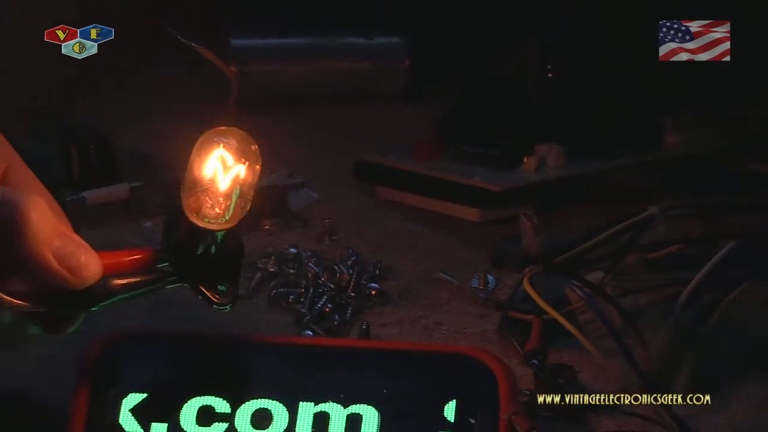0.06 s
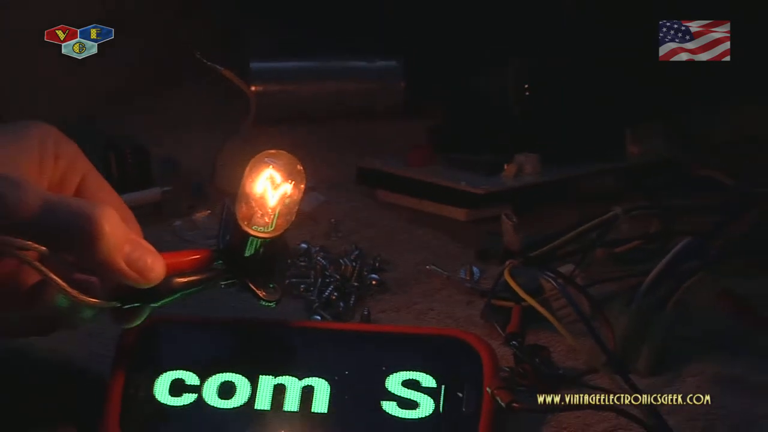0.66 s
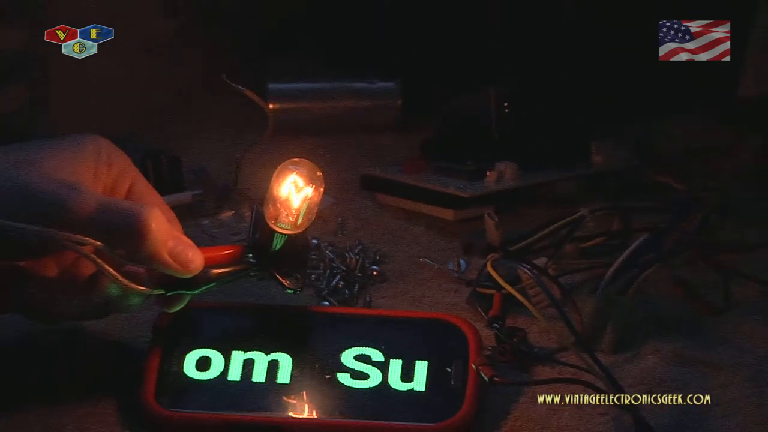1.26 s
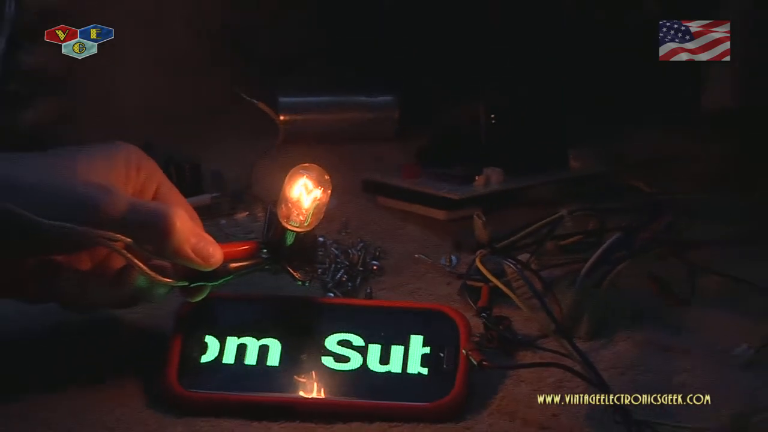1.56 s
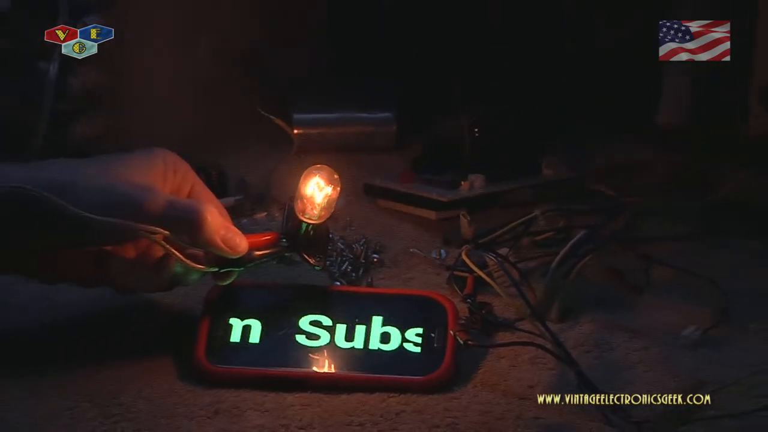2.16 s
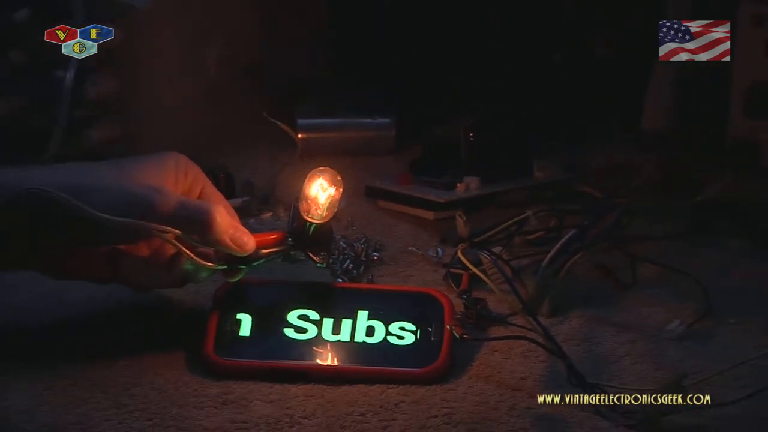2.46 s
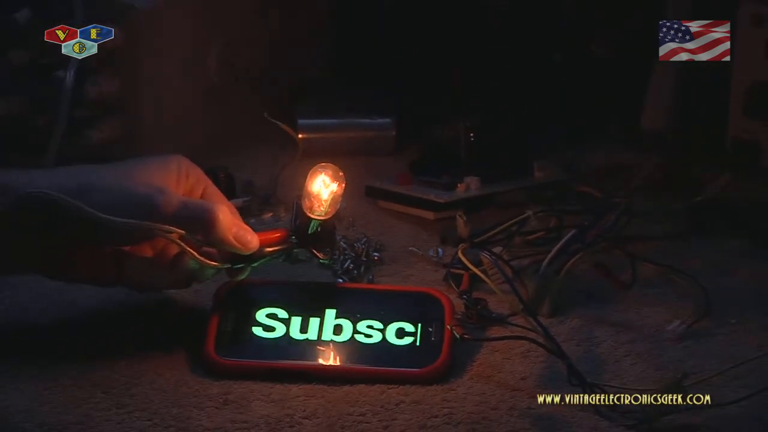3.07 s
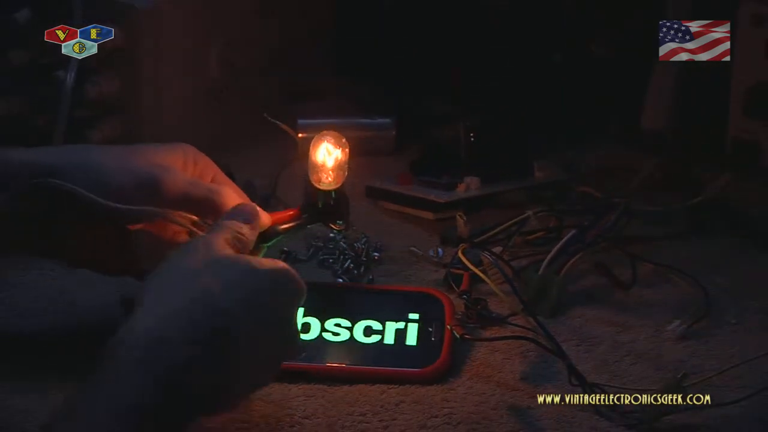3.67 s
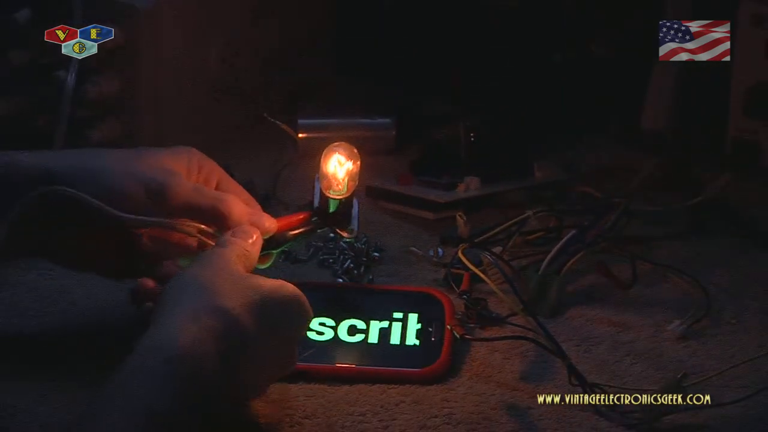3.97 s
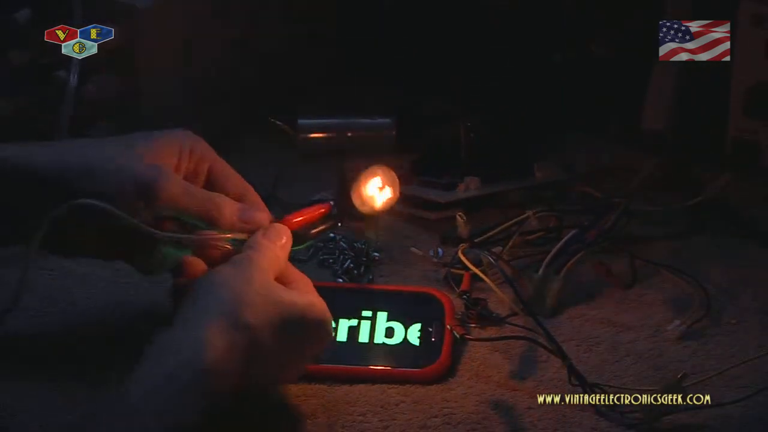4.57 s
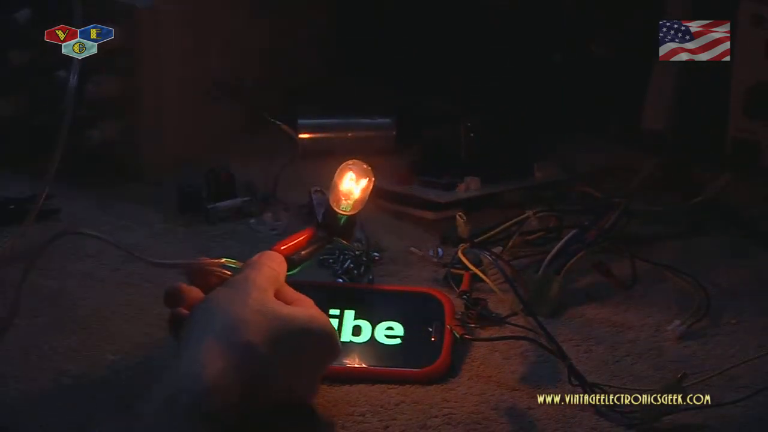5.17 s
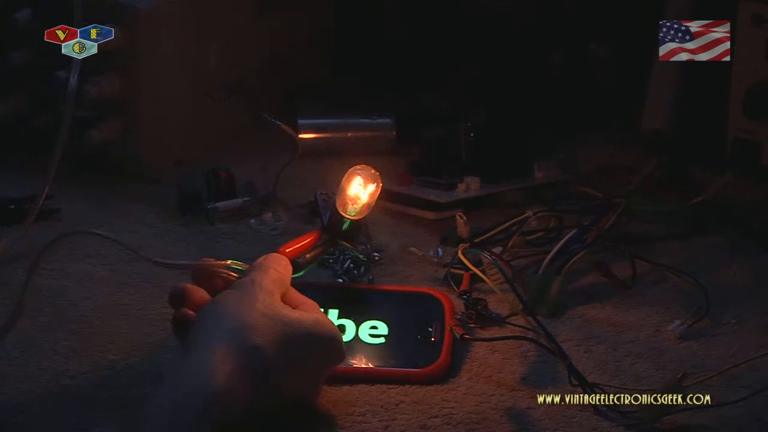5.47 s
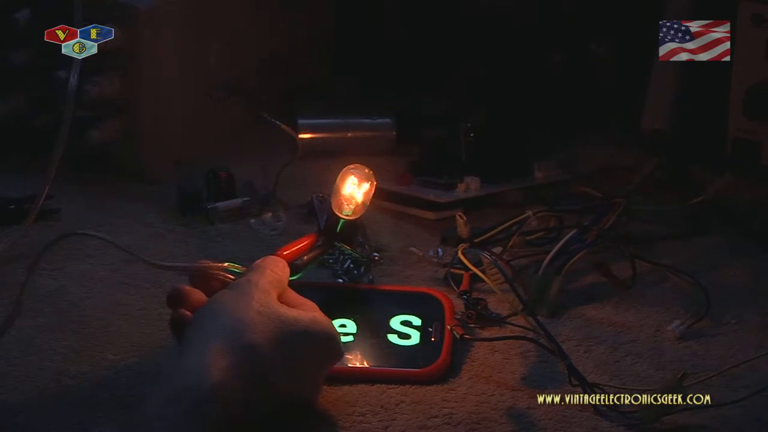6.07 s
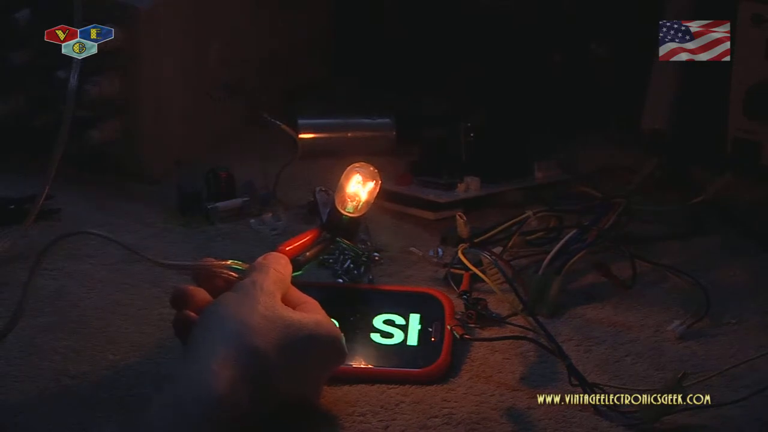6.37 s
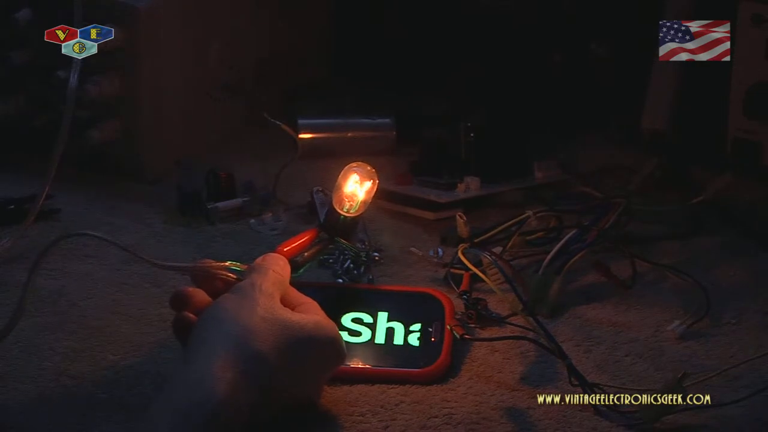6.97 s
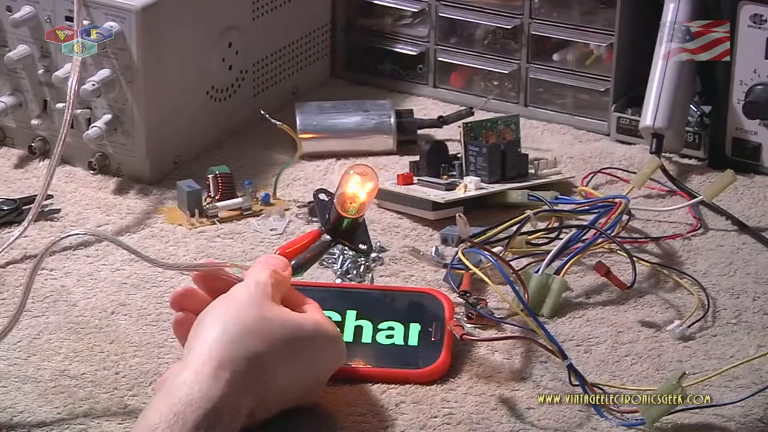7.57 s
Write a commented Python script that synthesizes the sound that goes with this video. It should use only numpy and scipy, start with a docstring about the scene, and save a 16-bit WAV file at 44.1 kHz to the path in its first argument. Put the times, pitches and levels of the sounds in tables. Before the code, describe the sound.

A small transformer hums faintly on a workbench, steady from start to finish over soft room tone and hiss. For the first three seconds nothing else is heard. From about 3 seconds a sleeve brushes past on the right in short, quiet strokes, and hand-held clip leads give small clicks and scrapes, with dull taps close to the microphone. Around 5 seconds come a couple of soft bumps on the bench, then more scattered taps, one lighter and higher at about 5.6 seconds, and another low bump near 6.4 seconds. At 6.7 seconds a switch is pressed with a muted click. At 7.4 seconds it snaps over, the loudest sound: a bright spring tick and a hard knock on its case, with a faint metallic ring and brief small-room reverberation. Two soft taps follow just before 8 seconds as the hum continues.

```python
"""A small transformer hums on a workbench over steady room tone, its core flexing with the mains.
From about 3 s a sleeve brushes past on the right and hand-held clip leads click and scrape,
with dull taps and, from about 5 s, a few soft bumps close by and one light, higher tap.
At 6.7 s a switch is pressed and at 7.4 s it snaps over: its spring ticks, its rocker knocks
the case, its metal cover rings faintly and the small room answers."""
import sys
import numpy as np
from scipy import signal
from scipy.fft import rfft, irfft, next_fast_len
from scipy.io import wavfile
from scipy.ndimage import map_coordinates

SR = 44100
rng = np.random.default_rng(int(sys.argv[2]) if len(sys.argv) > 2 else 0)


def wrap_up_sound(samples):
    """Save the sound to the file named by the first command line argument, as 16-bit audio."""
    columns = np.atleast_2d(samples).T
    # keep every value between -1 and 1, then stretch to whole-number steps
    tamed = np.clip(columns, -1, 1)
    steps = np.round(tamed * 32767).astype(np.int16)
    wavfile.write(sys.argv[1], SR, steps)


N = 344421


def amp(db):
    """Decibels to gain."""
    return 10 ** (np.asarray(db) / 20)


def unit(x):
    """Scale to rms 1."""
    return x / np.sqrt(np.mean(x ** 2) + 1e-20)


def along(points, hz):
    """Interpolate (frequency, value) points on a log axis."""
    f, v = np.transpose(points)
    return np.interp(np.log(hz + 1), np.log(f + 1), v)


def wobble(rate_hz):
    """Smooth random curve through rate_hz knots a second."""
    knots = rng.standard_normal(int(N * rate_hz / SR) + 4)
    return map_coordinates(knots, [np.arange(N) * rate_hz / SR])


def filtered(x, response):
    """Apply a frequency response."""
    n = x.shape[-1]
    m = next_fast_len(n + 8192)
    return irfft(rfft(x, m) * response(np.fft.rfftfreq(m, 1 / SR)), m)[..., :n]


def resonance(f, centre_hz, width_hz):
    """Second-order band-pass response."""
    return 1j * f * width_hz / (centre_hz ** 2 - f * f + 1j * f * width_hz)


def ring(t, hz, t60_s):
    """One decaying mode."""
    return np.sin(2 * np.pi * hz * t) * 1000 ** (-t / t60_s)


def add(track, start_s, sound):
    """Mix a sound into a track."""
    part = track[..., round(start_s * SR):][..., :sound.shape[-1]]
    part += sound[..., :part.shape[-1]]


def panned(x, right_db):
    """Pan by level, right over left."""
    return x * amp([[-right_db / 2], [right_db / 2]])


def left_first(x, lead_ms):
    """Pan by arrival time; a negative lead puts the right first."""
    return filtered(x, lambda hz: np.exp(1j * np.pi * hz * lead_ms / 1000 * np.array([[1], [-1]])))


def mid_side_gains(coherence, hz):
    """Mid and side gains for a left-right coherence curve."""
    angle = np.arccos(np.clip(along(coherence, hz), -1, 1)) / 2
    return np.array([np.cos(angle), np.sin(angle)])


def stereo_noise(spectrum, coherence):
    """Coloured stereo noise of rms 1."""
    white = rng.standard_normal((2, N))
    mid, side = filtered(white, lambda hz: amp(along(spectrum, hz)) * mid_side_gains(coherence, hz))
    return unit(np.array([mid + side, mid - side]))


# room decay: (frequency [Hz], t60 [s])
ROOM_DECAY = [(200, 0.57), (800, 0.13), (1400, 0.25), (3000, 0.21), (6000, 0.17), (14000, 0.14)]


def room(x, coherence):
    """Reverberation from near walls; bass lingers longest."""
    hz, t, noise = signal.stft(rng.standard_normal((2, SR // 2)), SR, nperseg=256)
    decay = amp(-60 * t / along(ROOM_DECAY, hz)[:, None])
    mid, side = signal.istft(noise * decay * mid_side_gains(coherence, hz[:, None]), SR, nperseg=256)[1]
    tail = np.pad([mid + side, mid - side], ((0, 0), (SR // 400, 0)))  # 2.5 ms pre-delay
    return signal.fftconvolve(x[None], tail / np.linalg.norm(tail[0]), axes=1)[:, :N]


# room tone: (frequency [Hz], relative density [dB])
AIR_SPECTRUM = [(15, -52), (25, -18), (69, -18), (116, -10.5), (169, -21), (233, -16.5), (421, -10.5),
                (482, -11), (537, -9.5), (895, -15.5), (1450, -18), (1710, -21.5), (1950, -20.5),
                (2920, -27), (15500, -31.5)]
# room tone: (frequency [Hz], left-right coherence [0..1])
AIR_COHERENCE = [(60, 1), (300, 0.87), (1000, 0.81), (2000, 0.52), (4000, 0.14), (12000, 0.064)]
# narrow drones: (centre [Hz], width [Hz], rms level [dB])
DRONE_BANDS = [(53.4, 8.1, -76), (116.3, 9.9, -73), (185, 102, -69.5), (563, 72, -69), (1457, 170, -77),
               (1950, 78, -74)]


def background(air_db=-58):
    """Steady room tone and hiss; narrow bands drone from the right."""
    air = amp(air_db) * stereo_noise(AIR_SPECTRUM, AIR_COHERENCE)
    drone = np.zeros(N)
    for hz, width_hz, db in DRONE_BANDS:
        band = filtered(rng.standard_normal(N), lambda f: resonance(f, hz, width_hz) ** 2)
        drone += amp(db) * unit(band)
    return left_first(air + drone, lead_ms=-0.094)


# core hum: (harmonic [x mains], rms level [dB])
HUM_HARMONICS = [(2, -65), (4, -71), (5, -77), (6, -73), (8, -55.5), (9, -89), (10, -74), (12, -76),
                 (16, -88), (18, -80.5), (24, -72.5), (40, -84.5)]


def transformer(mains_hz=59.99, waver_db=0.38):
    """The core flexes twice a mains cycle, so even harmonics dominate; each wavers a little."""
    phase = 2 * np.pi * mains_hz * np.arange(N) / SR
    hum = np.zeros(N)
    for harmonic, db in HUM_HARMONICS:
        peak = np.sqrt(2) * amp(db + waver_db * wobble(rate_hz=2.96))
        hum += peak * np.sin(harmonic * phase + 2 * np.pi * rng.random())
    return panned(hum, right_db=-0.7)


# cloth friction: (frequency [Hz], relative density [dB])
CLOTH_SPECTRUM = [(40, -18), (130, -7), (300, 2), (520, 4.5), (800, -0.5), (1200, -2), (1500, 0.5),
                  (2000, -4), (2900, -9.5), (4500, -12), (5800, -14.5), (7200, -13), (8800, -17),
                  (11500, -16.5), (15500, -22)]
# cloth friction: (frequency [Hz], left-right coherence [0..1])
CLOTH_COHERENCE = [(100, 0.38), (600, 0.36), (1500, 0.31), (4000, 0), (12000, 0.18)]
# sleeve strokes: (centre time [s], length [s], relative level [dB])
SLEEVE_STROKES = [(3.2, 0.11, -63), (3.443, 0.17, -56.5), (3.636, .12, -58), (3.785, 0.052, -64),
                  (4.133, 0.028, -67), (5.056, 0.36, -54), (5.29, .2, -54.5), (5.64, 0.078, -64),
                  (5.86, 0.27, -62.5), (5.972, 0.086, -59.5), (6.213, 0.15, -58), (6.519, 0.22, -49.5),
                  (6.835, 0.14, -57), (7.103, 0.16, -62.5), (7.272, 0.092, -65)]


def sleeve(gain_db=5, grain_db=1.0, fold_db=1.66, steepness=2.5):
    """Cloth slides in strokes; fibres make it flutter and passing folds swell its lows and mids."""
    t, power = np.arange(N) / SR, np.zeros(N)
    for centre_s, length_s, db in SLEEVE_STROKES:
        power += (amp(db) / (1 + np.abs(2 * (t - centre_s) / length_s) ** steepness)) ** 2
    rub = stereo_noise(CLOTH_SPECTRUM, CLOTH_COHERENCE)
    body = filtered(rub, lambda f: 1 / (1 + (f / 2500) ** 4))
    rub += body * (amp(fold_db * wobble(rate_hz=35)) - 1)
    rub *= amp(grain_db * wobble(rate_hz=140))
    return panned(amp(gain_db) * np.sqrt(power) * unit(rub), right_db=5.0)


def soft_contacts(hits, rise_s, thud_gain):
    """Each hit is one well damped mode plus a shorter thud an octave up."""
    track, t = np.zeros(N), np.arange(SR // 5) / SR
    attack = 1 - np.exp(-t / rise_s)
    for start_s, db, hz, t60_s in hits:
        thud = thud_gain * ring(t, 2 * hz, t60_s / 4)
        add(track, start_s, -amp(db) * (ring(t, hz, t60_s) + thud) * attack)
    return track


# bench bumps: (time [s], level [dB], frequency [Hz])
BENCH_BUMPS = [(4.98, -41.5, 130), (5.043, -32, 250), (6.436, -43, 70)]


def bumps(t60_cycles=6.5):
    """Soft bumps on the bench; lower ones last longer."""
    hits = [(start_s, db, hz, t60_cycles / hz) for start_s, db, hz in BENCH_BUMPS]
    return soft_contacts(hits, rise_s=0.0016, thud_gain=0.3)


# light taps: (time [s], relative level [dB], t60 [s])
LIGHT_TAPS = [(3.4507, -32.5, .016), (4.8412, -31.5, 0.0072), (5.263, -43, .02), (5.299, -35.5, 0.018),
              (5.335, -37.5, 0.023), (5.406, -32, 0.0081), (5.557, -42, 0.028), (5.921, -30, 0.03),
              (5.948, -32, .007), (6.1343, -32, .019), (6.229, -35, .012), (6.2355, -26.5, 0.014),
              (6.539, -36.5, .025), (6.595, -45, .024), (6.631, -36.5, .014), (6.679, -39.5, .026),
              (7.7464, -39.5, 0.032), (7.796, -37, 0.025)]


def taps(mode_hz=533):
    """Light taps close on the right wake one mode; some are damped sooner."""
    hits = [(start_s, db, mode_hz, t60_s) for start_s, db, t60_s in LIGHT_TAPS]
    return panned(soft_contacts(hits, rise_s=0.0008, thud_gain=0.9), right_db=20)


# short clicks and scrapes, one light tap: (centre time [s], level [dB], frequency [Hz], half length [s])
SMALL_CONTACTS = [(3.407, -52.5, 4000, 0.0019), (3.453, -43, 1100, 0.0012), (3.620, -45, 2000, 0.0023),
                  (3.6205, -52, 4500, 0.001), (3.662, -49.5, 1900, .0044), (3.801, -52, 2090, .0017),
                  (5.031, -51, 2000, 0.0022), (5.081, -52, 1800, .004), (5.149, -48.5, 1200, 0.0063),
                  (5.2355, -52, 3500, 0.00043), (5.6105, -47, 900, 0.0016), (7.236, -44, 1370, 0.0029),
                  (7.267, -55.5, 1390, 0.041)]


def small_contacts(wet_db=-8, width_ratio=0.36):
    track, t = np.zeros(N), np.arange(-SR // 20, SR // 20) / SR
    for centre_s, db, hz, half_s in SMALL_CONTACTS:
        colour = lambda f: resonance(f, hz, width_ratio * hz) / (1 + (f / (3 * hz)) ** 2)
        grit = unit(filtered(rng.standard_normal(len(t)), colour))
        add(track, centre_s + t[0], amp(db) * grit * np.exp(-(t / half_s) ** 2))
    return track + amp(wet_db) * room(track, AIR_COHERENCE)


def scattered_noise(n):
    """White noise scattered by clutter, only partly alike left and right."""
    return unit(rng.standard_normal(n) + 0.7 * rng.standard_normal((2, n)))


# press, then snap: (time [s], tick level [dB], tick width [Hz], knock level [dB], low-pass [Hz],
# rattle length [s])
SWITCH_THROWS = [(6.7468, -34, 2500, -13, 1540, .0082), (7.3786, -7, 3940, -5, 6500, .0052)]
# contacts in each throw: (delay [x rattle length], tick offset [dB], knock offset [dB])
THROW_CONTACTS = [(0, -7, -14.5), (.3, -1, -14), (.42, -16, -1), (.95, -14, -5.5)]
# switch case: (frequency [Hz], relative level [dB], t60 [s])
CASE_MODES = [(874, -9.5, 0.014), (1340, -8, 0.011), (1850, -8, 0.011), (2180, -10.5, 0.023),
              (3460, -3, 0.0048), (4500, 1, 0.0046), (5240, 4.5, 0.002), (8000, -6, 0.0037)]
# metal cover: (frequency [Hz], relative level [dB], t60 [s])
COVER_MODES = [(777, -42, 0.93), (1180, -40.5, 0.61), (1400, -41.5, 0.47), (1340, -41, 0.68)]
# switch reverberation: (frequency [Hz], left-right coherence [0..1])
REVERB_COHERENCE = [(500, 1), (1500, 1), (3000, 0.26), (8000, 0.27)]


def switch(spring_hz=12340, crack_db=-17, wet_db=-3.0, tick_send_db=-3.5):
    """The spring ticks, the rocker knocks the case and bounces; the press is duller than the snap."""
    track, t = np.zeros((2, N)), np.arange(SR // 2) / SR
    case = sum((-1) ** k * amp(db) * ring(t, hz, t60_s) for k, (hz, db, t60_s) in enumerate(CASE_MODES))
    cover = sum(amp(db) * ring(t, hz, t60_s) for hz, db, t60_s in COVER_MODES)
    highpass = signal.butter(4, 620, "high", fs=SR, output="sos")  # a small case radiates little bass
    for start_s, spring_db, width_hz, case_db, lowpass_hz, rattle_s in SWITCH_THROWS:
        lowpass = signal.butter(3, lowpass_hz, fs=SR, output="sos")
        for share, tick_db, knock_db in THROW_CONTACTS:
            spring = filtered(scattered_noise(len(t)), lambda f: resonance(f, spring_hz, width_hz) ** 2)
            tick = amp(spring_db + tick_db) * unit(spring) * np.exp(-t / 0.0012)
            crack = amp(crack_db) * scattered_noise(len(t)) * np.exp(-t / 0.011)
            blow = amp(case_db + knock_db)
            knock = blow * signal.sosfilt(np.vstack([highpass, lowpass]), case + crack)
            reverb = room(knock[0] + amp(tick_send_db) * tick[0], REVERB_COHERENCE)
            contact_s = start_s + share * rattle_s
            add(track, contact_s, knock + blow * cover + panned(tick, right_db=-4))
            add(track, contact_s, amp(wet_db) * reverb)
    return left_first(track, lead_ms=0.11)


def scene():
    """Everything on and around the bench."""
    return background() + transformer() + sleeve() + bumps() + taps() + small_contacts() + switch()


def record(dry):
    """Steep low-pass at 15.85 kHz."""
    return filtered(dry, lambda hz: 1 / np.sqrt(1 + (hz / 15850) ** 300))


dry = scene()
out = record(dry)
wrap_up_sound(out)
```